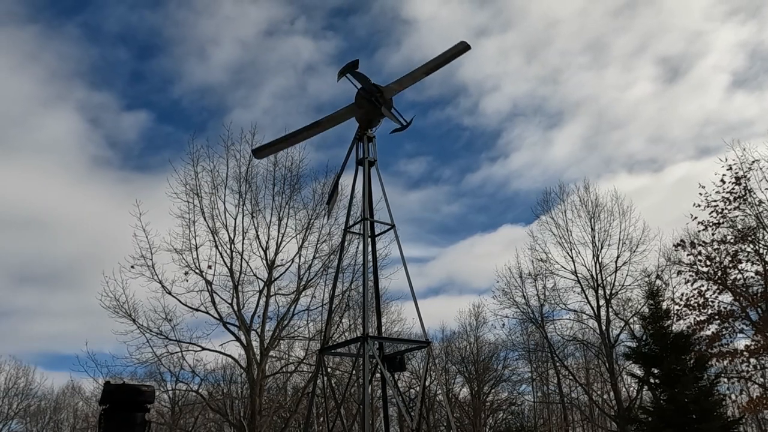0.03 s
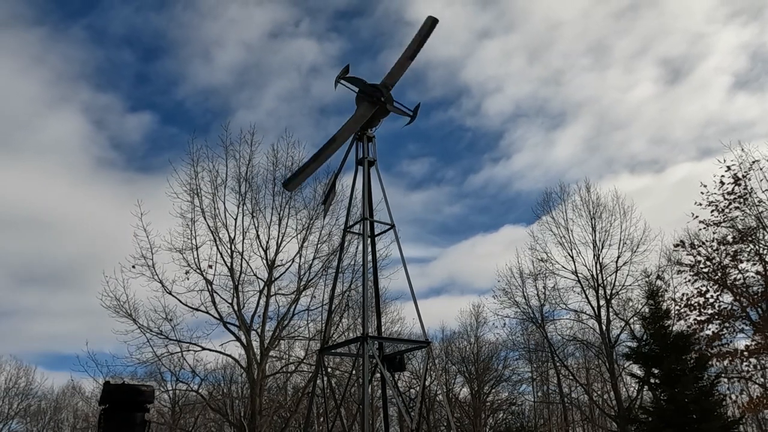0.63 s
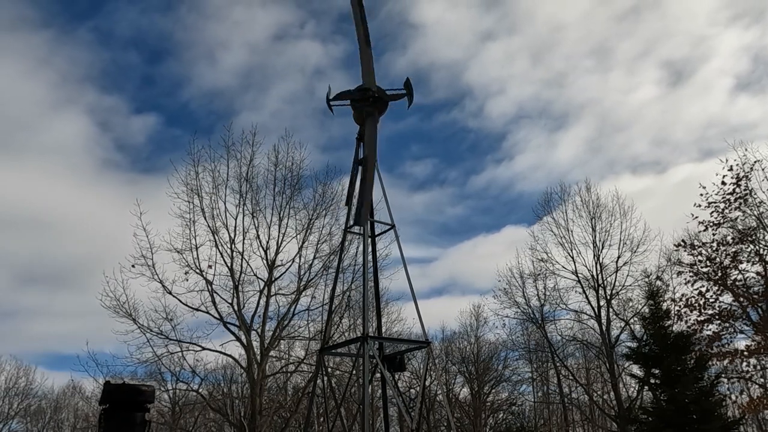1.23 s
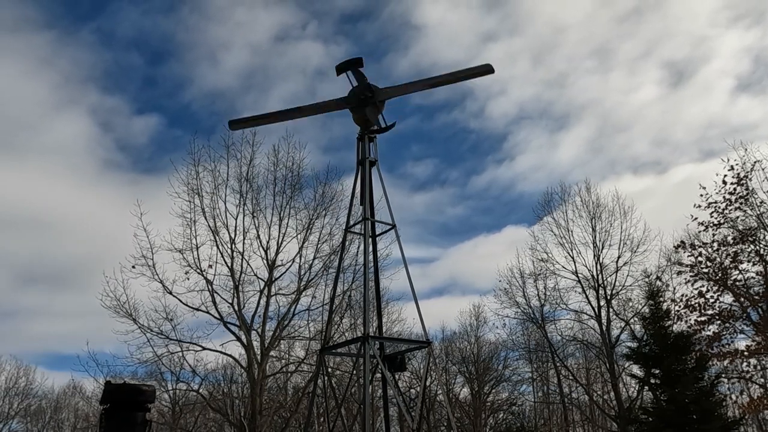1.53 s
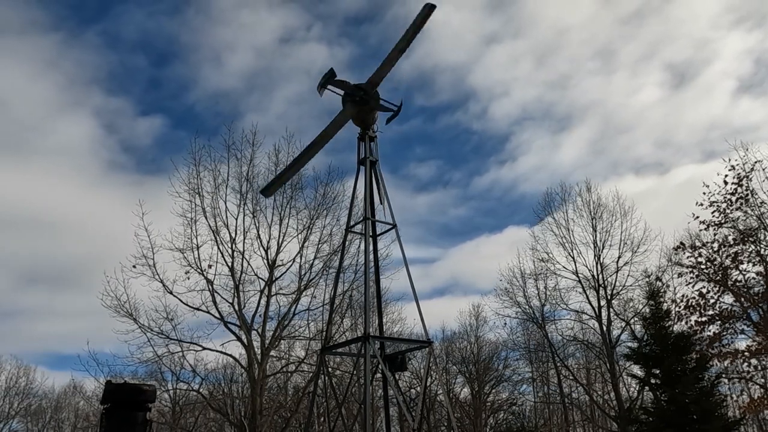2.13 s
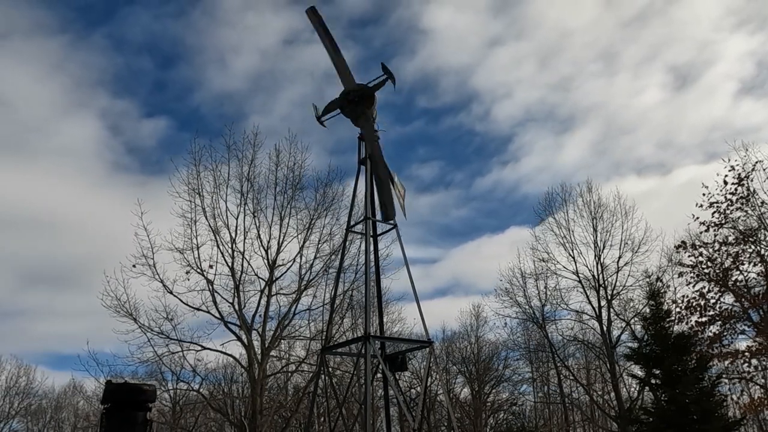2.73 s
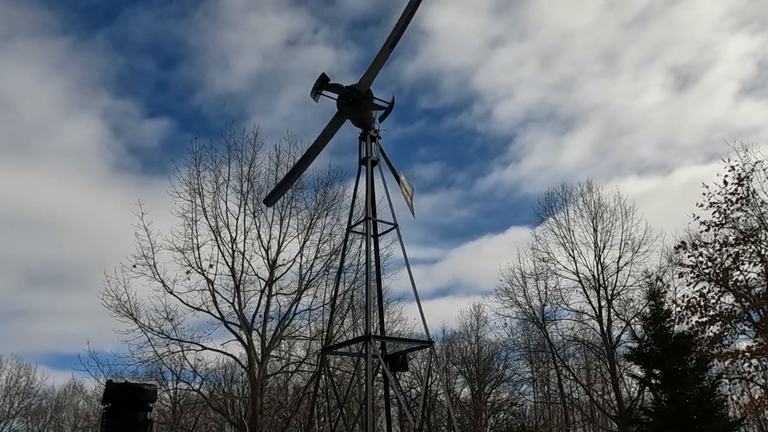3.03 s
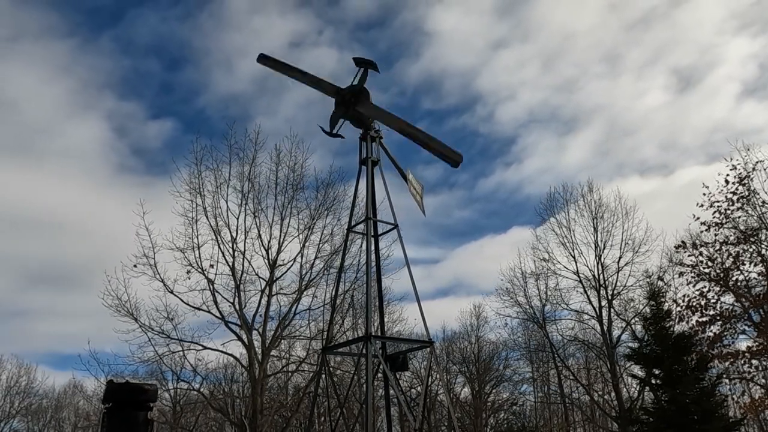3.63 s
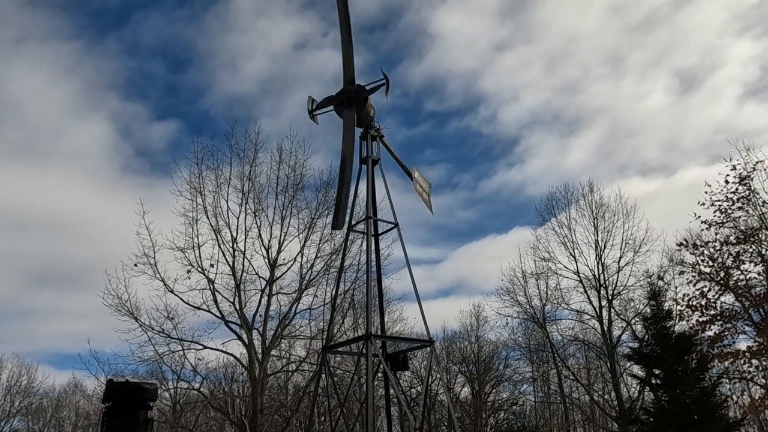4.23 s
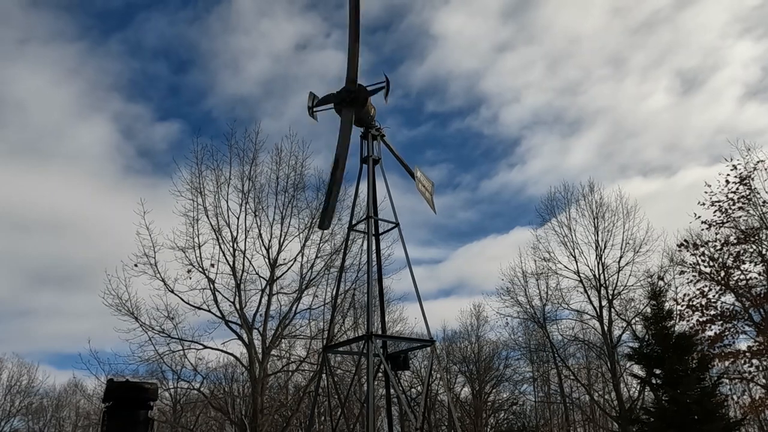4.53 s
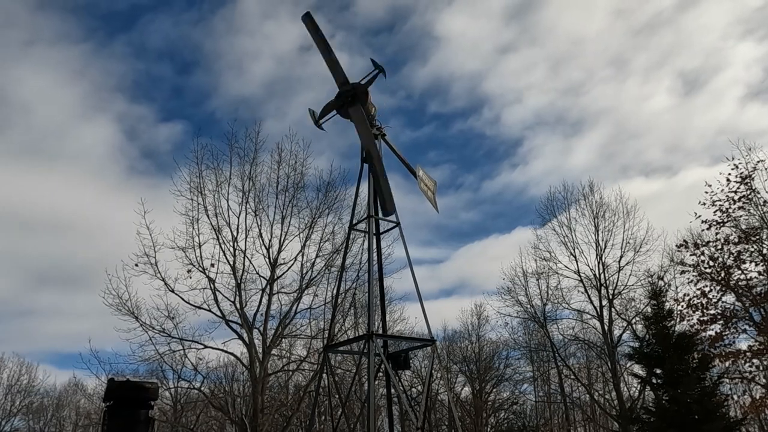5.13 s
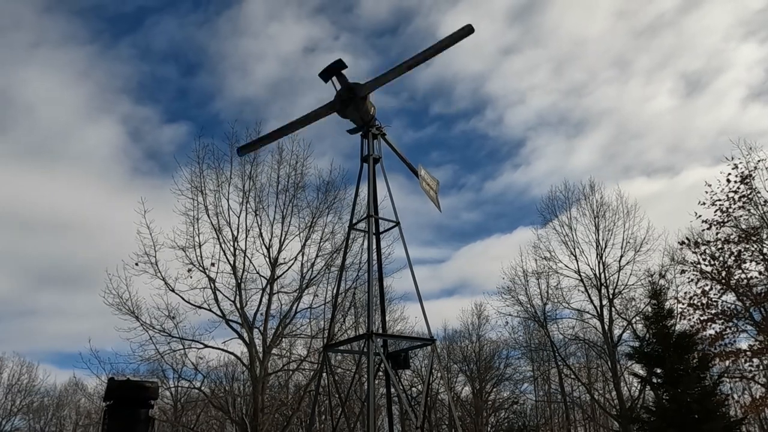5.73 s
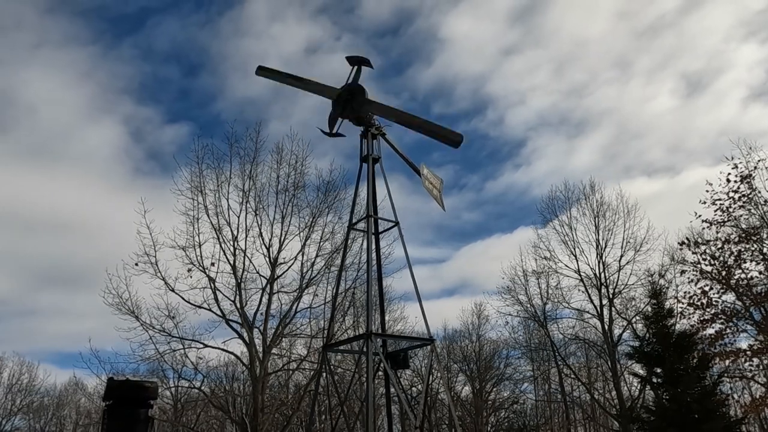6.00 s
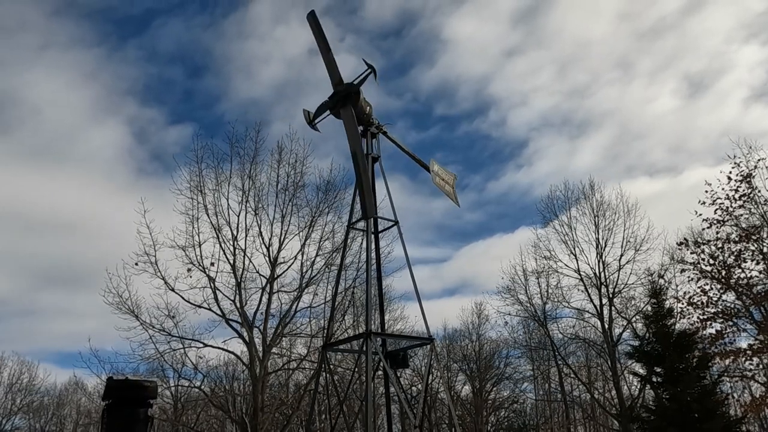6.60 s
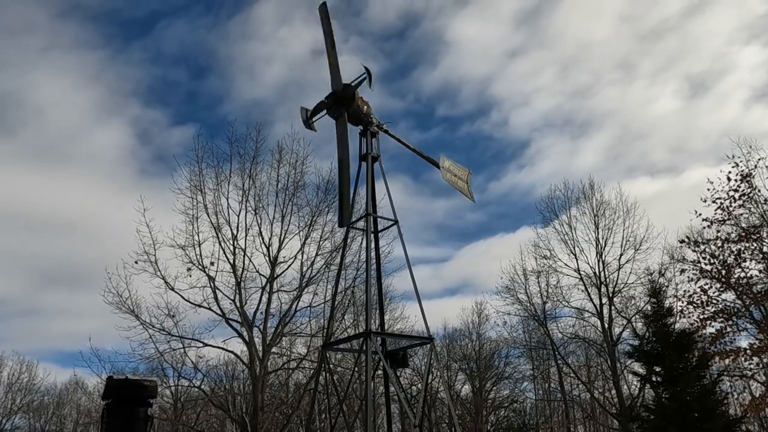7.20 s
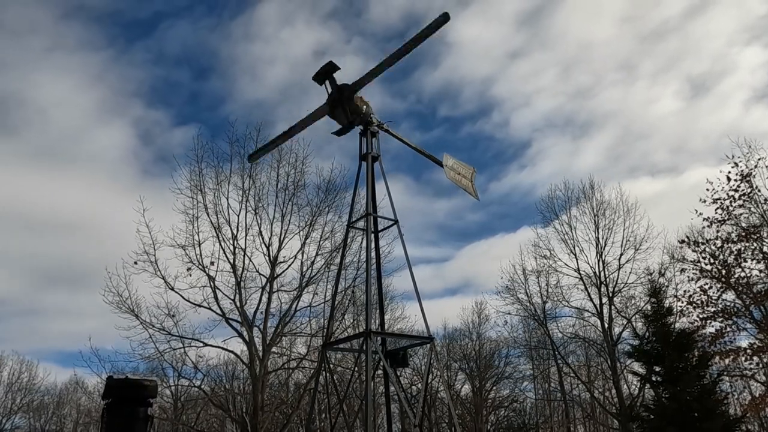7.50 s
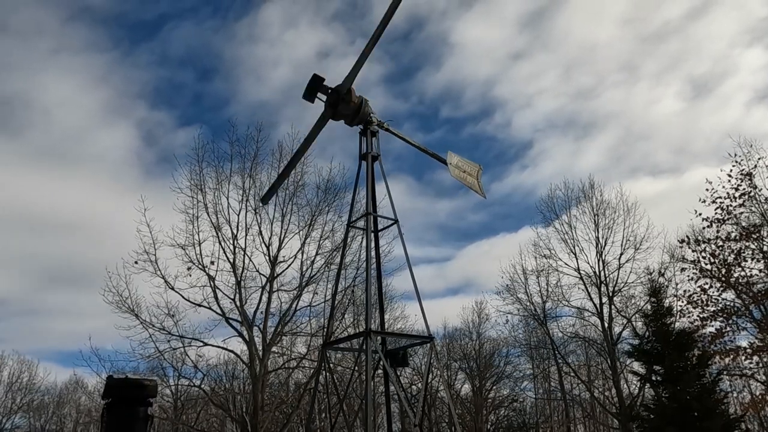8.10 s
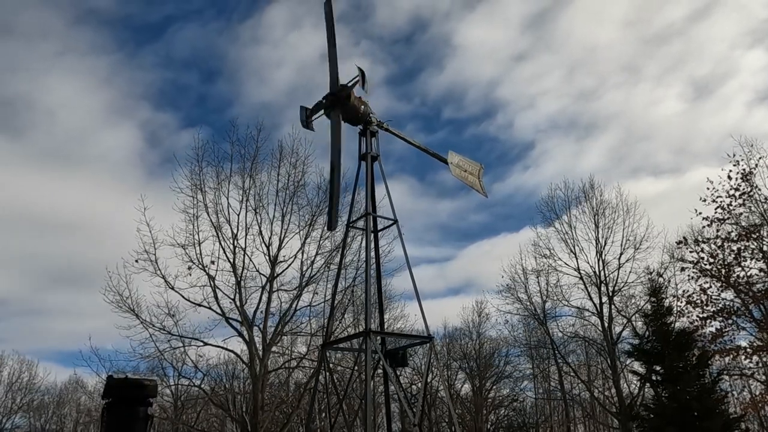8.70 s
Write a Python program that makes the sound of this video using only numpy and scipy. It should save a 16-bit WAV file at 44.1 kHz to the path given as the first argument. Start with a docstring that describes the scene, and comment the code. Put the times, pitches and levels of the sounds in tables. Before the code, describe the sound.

A wind turbine on a metal tower is heard from the ground, at first half buried by heavy wind buffeting the microphone. Its rapid, regular ticking emerges with swishing blades, short high squeaks, rattling parts and a low hum. As the gust fades, the rush in the trees softens and the ticks carry on slightly slower, with soft knocks between them and a few more wind thumps.

```python
"""Gusty wind thumps on the microphone and roars in bare trees, while a wind generator ticks and swishes.
Its two blades swish twice a turn, and its lattice tower drones. The mechanism ticks once a turn,
knocks softly in between and squeaks at speed. Loose parts chatter and scrape in the gust.
As the gust dies down, the rotor slows and the ticks spread apart."""
import sys
import numpy as np
from scipy import signal
from scipy.fft import rfft, irfft
from scipy.io import wavfile
from scipy.ndimage import uniform_filter1d

SR = 44100
rng = np.random.default_rng(int(sys.argv[2]) if len(sys.argv) > 2 else 0)


def unload_audio(sound):
    """Save the sound as a 16-bit wav file, at the path given as the first command line argument."""
    columns = np.transpose(np.atleast_2d(sound))
    # keep every value between -1 and 1, then stretch to whole-number steps
    steps = np.round(np.clip(columns, -1, 1) * 32767)
    wavfile.write(sys.argv[1], SR, steps.astype(np.int16))


N = 394694
TIME = np.arange(N) / SR
FREQS_HZ = np.arange(N // 2 + 1) * SR / N


def undb(db):
    """Turn decibels into a gain."""
    return 10 ** (np.asarray(db) / 20)


def unit(x):
    """Scale a signal to an average (rms) size of 1."""
    return x / np.sqrt(np.mean(x ** 2))


def curves(table, at=TIME):
    """Join a table's rows by straight lines in time: one curve for each column after the first."""
    times, *columns = np.transpose(table)
    return [np.interp(at, times, column) for column in columns]


def noise(colour):
    """Noise shaped by rows of (pitch_hz, level_db), fading away beyond the first and last row."""
    hz, db = np.transpose(colour)
    f = np.maximum(FREQS_HZ, 1)
    gain = undb(np.interp(np.log(f), np.log(hz), db))
    edges = np.minimum(f / hz[0], 1) ** 2 * np.minimum(hz[-1] / f, 1) ** 2
    return unit(irfft(rfft(rng.standard_normal(N)) * gain * edges, N))


def resonant(peaks):
    """Noise that hums around a few pitches, from rows of (pitch_hz, width_hz, level_db)."""
    gain = sum(undb(db) / np.sqrt(width) / (1 + ((FREQS_HZ - hz) / (width / 2)) ** 2)
               for hz, width, db in peaks)
    return unit(irfft(rfft(rng.standard_normal(N)) * gain, N))


def band_noise(low_hz, high_hz, size):
    """A short stretch of noise between two pitches."""
    band = signal.butter(3, [low_hz, high_hz], "band", fs=SR, output="sos")
    return unit(signal.sosfilt(band, rng.standard_normal(2 * size))[size:])


def wander(rate_hz):
    """A smooth random wobble of size about 1, with rate_hz new values a second."""
    hold = max(int(SR / rate_hz), 2)
    steps = np.repeat(rng.standard_normal(N // hold + 1), hold)
    return unit(uniform_filter1d(uniform_filter1d(steps, hold), hold)[:N])


def add(out, start_s, sound):
    """Mix a sound in at a given time."""
    i = int(np.clip(start_s * SR, 0, N - 1))
    out[i:i + len(sound)] += sound[:N - i]


def swell(middle_s, half_length_s):
    """A steep-sided bump in loudness: returns its start time and its shape."""
    t = np.arange(-2 * half_length_s, 2 * half_length_s, 1 / SR)
    return middle_s - 2 * half_length_s, np.exp(-np.abs(t / half_length_s) ** 4)


# How loud the trees roar: time_s, level_db
ROAR_LEVEL = [(0, -36), (.6, -46), (1.2, -69), (1.8, -38.5), (2.45, -35), (2.9, -42), (3.35, -37.5),
              (4.2, -42), (5.7, -42.5), (6.4, -44), (7, -47), (8.95, -47.5)]
# The tone of the roar: pitch_hz, level_db
ROAR_COLOUR = [(100, 7), (300, 4.5), (600, 0), (850, 0), (1100, 0.5), (1400, -8), (1800, -20), (3000, -43),
               (7000, -27), (12000, -42.5)]
# The wind's faint whistle: pitch_hz, width_hz, level_db
WHISTLE_PEAKS = [(773, 26, 0.5), (880, 120, 2)]
# The tone of the steady hiss: pitch_hz, level_db
HISS_COLOUR = [(2000, 15.5), (7500, 4), (9500, -1), (10800, -6.5), (12300, -2), (13500, -33)]

def trees():
    """Wind roars through bare branches, with a faint whistle and a steady hiss."""
    level_db, = curves(ROAR_LEVEL)
    roar = undb(level_db + 0.5 * wander(rate_hz=21)) * noise(ROAR_COLOUR)
    whistle = undb(-57 + 0.99 * wander(rate_hz=4.15)) * resonant(WHISTLE_PEAKS)
    return roar + whistle + undb(-60.5) * noise(HISS_COLOUR)


# Wind strength at the microphone: time_s, rumble_db, flutter_db
WIND_LEVEL = [(0, -17.5, -23), (.45, -21.5, -20.5), (.9, -20, -25.5), (1.25, -21, -24), (1.6, -23.5, -30.5),
              (2.25, -25, -31), (2.72, -23, -23.5), (3.05, -26.5, -34.5), (3.35, -25, -31.5),
              (3.95, -28, -39.5), (4.25, -33, -40), (4.7, -33, -53), (5.4, -29.5, -42), (6.1, -35.5, -50),
              (6.85, -33.5, -39.5), (7.45, -38, -38.5), (8.03, -29.5, -37), (8.4, -36, -50.5),
              (8.95, -30.5, -37.5)]
# Single puffs on top of it: middle_s, rumble_db, flutter_db, width_s
WIND_PUFFS = [(2.755, -29, -26, 0.097), (5.073, -29, -34.5, 0.034), (5.661, -21, -27, 0.043),
              (5.826, -28, -41, 0.038), (6.415, -28, -36.5, 0.059), (7.07, -39, -34, 0.083),
              (7.507, -36, -33, 0.047), (7.807, -31, -31.5, 0.037), (8.2, -34, -35, .03),
              (8.361, -25, -60, 0.013), (8.527, -18, -35.5, 0.028), (8.692, -22, -51, 0.043)]
# The tones of the rumble and the flutter: pitch_hz, level_db
RUMBLE_COLOUR = [(10, 7.5), (22, 6), (50, 3.5), (100, -5), (150, -14), (250, -20), (500, -53)]
FLUTTER_COLOUR = [(50, 3), (100, 6), (175, 2), (215, -3), (300, -9.5), (450, -17.5), (700, -26.5),
                  (1500, -49)]

def buffeting():
    """Wind pushes on the microphone: a deep rumble and a faster flutter swell with each puff."""
    wind_db = curves(WIND_LEVEL)
    rumble_gain, flutter_gain = undb(wind_db)
    for middle_s, rumble_db, flutter_db, width_s in WIND_PUFFS:
        puff = np.exp(-.5 * ((TIME - middle_s) / width_s) ** 2)
        rumble_gain = np.hypot(rumble_gain, undb(rumble_db) * puff)
        flutter_gain = np.hypot(flutter_gain, undb(flutter_db) * puff)
    # a weak wind comes more in fits
    fits_db = np.interp(wind_db[0], [-34, -22], [2.3, 1]) * wander(rate_hz=24)
    rumble = rumble_gain * noise(RUMBLE_COLOUR)
    flutter = flutter_gain * undb(0.46 * wander(rate_hz=69)) * noise(FLUTTER_COLOUR)
    return undb(fits_db) * (rumble + flutter)


def eddy(db, length_s, hz):
    """A swirl of air makes a ragged thump: one sharp pressure kick among weaker, slower ones."""
    t = TIME[:int(4 * length_s * SR) + SR // 50] - 2 * length_s - .01
    out = np.zeros(len(t))
    for k, (when, weak, slow, skew) in enumerate(rng.random((3 + int(hz * length_s), 4))):
        lesser = k > 0  # the first kick is the main one
        offset_s = lesser * 1.4 * length_s * (2 * when - 1)
        cycles = (t - offset_s) * hz * (1 - lesser * 0.5 * slow)
        kick = np.exp(-np.abs(cycles / 0.42) ** 1.34) * np.cos(2 * np.pi * (cycles + skew))
        out += undb(db - lesser * (2.5 + 6.3 * weak)) * kick
    return out


# Strong swirls of air: middle_s, level_db, length_s, pitch_hz
STRONG_EDDIES = [(0.151, -11.5, 0.015, 345), (0.21, -10, 0.0095, 346), (.347, -12.5, 0.017, 430),
                 (0.4, -16, 0.004, 370), (0.45, -13.5, 0.0089, 470), (0.474, -17.5, 0.0034, 590),
                 (.515, -12, 0.014, 420), (0.745, -13.5, 0.012, 400), (0.851, -14.5, 0.0062, 347),
                 (0.894, -14.5, 0.01775, 350), (1.078, -13.5, 0.0088, 454), (1.12, -18, 0.0031, 360),
                 (1.17, -17, 0.0083, 268), (1.295, -21, 0.0023, 368), (1.375, -17, 0.0041, 330),
                 (2.764, -13, 0.021, 296), (5.121, -14.5, 0.017, 150), (5.67, -13, 0.02, 175),
                 (7.756, -19.5, 0.0052, 125), (7.899, -21.5, 0.0053, 188), (8.521, -15, 0.0042, 140)]

def eddies():
    """Swirls hit the microphone; small random ones get louder and sharper in stronger wind."""
    out = np.zeros(N)
    when, size = rng.random(size=(70, 2)).T
    small_s = when * TIME[-1]
    small_db = curves(WIND_LEVEL, small_s)[1] + 2.4 + 6 * size
    small = [(s, db, .004, 290 * undb(.5 * (db + 11.5))) for s, db in zip(small_s, small_db)]
    for middle_s, db, length_s, hz in STRONG_EDDIES + small:
        thump = eddy(db, length_s, hz)
        add(out, middle_s - len(thump) / SR / 2, thump)
    return out


# How loud the tower drones: time_s, level_db
DRONE_LEVEL = [(0, -67), (1.5, -41), (2.2, -30), (3.6, -32.5), (4.3, -38.5), (5.5, -46.5), (6.3, -48),
               (7.2, -47), (8.2, -48), (8.95, -63)]
# The tower's low notes: pitch_hz, width_hz, level_db
TOWER_PEAKS = [(169.3, 37, 4), (217, 64, -16.5)]

def tower():
    """The turning generator makes the lattice tower drone."""
    level_db, = curves(DRONE_LEVEL)
    return undb(level_db - 3.5) * resonant(TOWER_PEAKS)


# The rotor runs down as the wind drops: time_s, turns_per_s
ROTOR_SPEED = [(0.0, 7.729), (0.6, 7.373), (1.5, 7.045), (1.9, 7.499), (3.1, 7.068), (3.6, 7.323),
               (4.2, 6.755), (5.3, 6.442), (6.3, 5.978), (7.5, 5.808), (8.4, 5.539), (8.95, 5.571)]

def rotor_turns():
    """How many turns the rotor has made, starting just short of zero."""
    speed, = curves(ROTOR_SPEED)
    return np.cumsum(speed) / SR - .107


def each_turn(place):
    """The times at which the rotor passes a place (0 to 1) in its turn."""
    turns = rotor_turns() - place
    return np.interp(np.arange(np.ceil(turns[0]), turns[-1]), turns, TIME)


# How loud the air rushes over the blades: time_s, level_db
BLADE_LEVEL = [(0.0, -41.5), (0.65, -47.5), (1.35, -46.5), (1.64, -42.5), (1.92, -44), (2.24, -45),
               (3.14, -45), (4.19, -52.5), (5.36, -57.5), (6.01, -55), (6.73, -58.5), (8.95, -62.5)]
# The tone of that rush: pitch_hz, level_db
RUSH_COLOUR = [(200, -19), (500, 3), (800, 4.5), (1400, 9.5), (1900, 3), (2800, 1.5), (4000, -5.5),
               (5500, -11.5), (7500, -20.5), (9300, -24), (10500, -33), (12500, -60), (14000, -54)]
# The hollow note in it: pitch_hz, width_hz, level_db
HOLLOW_PEAKS = [(1340, 540, 6), (2920, 980, -27)]

def blades():
    """Churning air makes a grainy hiss that swells as each blade sweeps towards the listener."""
    level_db, = curves(BLADE_LEVEL)
    turns = rotor_turns()
    swish_db = 1.14 * np.cos(2 * np.pi * 2 * (turns - .42))
    uneven_db = 0.094 * np.cos(2 * np.pi * (turns - .2))  # one blade is a little weaker
    grain_db = 1.06 * wander(rate_hz=250) + 1.17 * wander(rate_hz=30)
    # the hollow note grows faster than the hiss
    hollow = undb(-2.5 + .5 * (level_db - level_db.max())) * resonant(HOLLOW_PEAKS)
    return undb(level_db + 3.5 + swish_db + uneven_db + grain_db) * (noise(RUSH_COLOUR) + hollow)


# Short narrow rasps of metal, some sounding with a tick's clack: middle_s, pitch_hz, level_db, half_length_s
METAL_SCRAPES = [(1.69, 2630, -40.5, 0.026), (1.93, 3180, -39, .005), (2.513, 2820, -43, 0.0066),
                 (3.334, 2880, -45, 0.017), (8.836, 2780, -46, 0.0037)]

def scrapes():
    """Loose metal rubs briefly, sounding one narrow band of noise each time."""
    out = np.zeros(N)
    for middle_s, hz, db, half_length_s in METAL_SCRAPES:
        start_s, shape = swell(middle_s, half_length_s)
        add(out, start_s, undb(db) * shape * band_noise(.92 * hz, 1.08 * hz, len(shape)))
    return out


# Squeaks while the rotor runs fast: middle_s, pitch_hz, level_db
DRY_SQUEAKS = [(.915, 4500, -43), (1.3, 4630, -42), (1.435, 4700, -37.5), (1.58, 4840, -40),
               (1.715, 4800, -41), (1.85, 4850, -44), (1.985, 4820, -37), (2.258, 4760, -38),
               (2.395, 4750, -40), (2.667, 4800, -41.5), (2.805, 4720, -40), (2.945, 4700, -35),
               (3.087, 4850, -39), (3.218, 7650, -48)]

def squeaks():
    """A dry part squeaks with a trembling pitch and a stuttering grip, then catches again more softly."""
    out = np.zeros(N)
    second_catches = [(s + .045, hz, db - 7) for s, hz, db in DRY_SQUEAKS]
    for middle_s, hz, db in DRY_SQUEAKS + second_catches:
        start_s, shape = swell(middle_s, half_length_s=.0074 * np.exp(.3 * rng.standard_normal()))
        tremble, grip = (band_noise(60, 450, len(shape)) for _ in range(2))
        phase = 2 * np.pi * np.cumsum(hz * (1 + .013 * tremble)) / SR
        tone = np.sin(phase) + undb(-20) * np.sin(2 * phase)
        add(out, start_s, undb(db - 2.8) * shape * (.8 + .7 * grip) * tone)
    return out


def blows(times, dbs, bounce_db, decay_s, tail_s, tail_db, scrape_db, bounce_s=.0045):
    """The loudness of loose hits: a scrape, a blow, a bounce, and a tail scattered by tower and ground."""
    power, t = np.zeros(N), TIME[:SR // 5]
    hit = np.exp(-2 * t / decay_s)
    tail = undb(2 * tail_db) * np.exp(-2 * t / tail_s)
    for s, db, (late, lead) in zip(times, dbs, rng.standard_normal((len(times), 2))):
        add(power, s, undb(2 * db) * (hit + tail))  # doubling the decibels gives power
        add(power, s + bounce_s * np.exp(.3 * late), undb(2 * (db + bounce_db)) * hit)
        start_s, scrape = swell(s - .006, half_length_s=0.014 * np.exp(0.44 * lead))
        add(power, start_s, undb(2 * (db + scrape_db)) * scrape)
    return np.sqrt(power)


def dulled(contacts, onset_turns_per_s=6.8, cutoff_hz=11200):
    """A fast rotor drags its contacts, which takes away their highest treble."""
    speed, = curves(ROTOR_SPEED)
    share = .5 + .5 * np.tanh((speed - onset_turns_per_s) / .15)
    soft = irfft(rfft(contacts) / (1 + (FREQS_HZ / cutoff_hz) ** 6), N)
    return share * soft + (1 - share) * contacts


# The notes of the struck metal: pitch_hz, ring_s (time to fade by 60 dB), level_db
METAL_NOTES = [(1348, 0.15, -2.5), (2408, 0.1, -7.5), (2756, 0.047, -1.5), (3120, 0.05, -4.5),
               (5710, 0.038, -5), (7290, 0.058, -5.5), (7630, 0.029, -3), (8640, 0.028, -9.5)]

def ringing(times, low_dbs, high_dbs):
    """Struck metal rings in low and high notes; each blow lands a little differently."""
    out, t = np.zeros(N), TIME[:SR // 8]
    hz, ring_s, db = np.transpose(METAL_NOTES)[:, :, None]
    fade = np.exp(-np.log(1000) * t / ring_s) * (1 - np.exp(-t / .0004))
    chances = rng.standard_normal((len(times), 3, len(METAL_NOTES), 1))
    for s, low_db, high_db, (force, detune, offset) in zip(times, low_dbs, high_dbs, chances):
        gain = undb(db + np.where(hz < 4000, low_db, high_db) + 2.1 * force)
        phase = 2 * np.pi * (hz * (1 + .017 * detune) * t + offset)
        add(out, s, np.sum(gain * np.sin(phase) * fade, axis=0))
    return out


# How loud the loose parts chatter: time_s, level_db
CHATTER_LEVEL = [(0, -64), (.7, -50.5), (1.3, -45), (1.7, -45.5), (2.6, -47.5), (3.3, -43.5), (3.8, -50),
                 (4.5, -60)]
# The tones of a full clack and a bright click, also used by the ticks: pitch_hz, level_db
CLACK_COLOUR = [(600, -2.5), (1350, 2.5), (1850, -2.5), (2750, 0), (3700, -5.5), (4900, -13.5), (6500, -18),
                (12000, -27.5)]
CLICK_COLOUR = [(2500, -4), (4500, 5.5), (5800, 5), (7500, -1), (8800, -0.5), (10300, -14.5), (12500, -19),
                (15000, -29)]

def rattle():
    """Loose parts hit at random: rings follow the blades' loudness, and dry clicks crowd the gust."""
    when, force = rng.random(size=(170, 2)).T
    hit_s = when * TIME[-1]
    hit_db = 1.184 * curves(BLADE_LEVEL, hit_s)[0] + 7 * force
    ring = ringing(hit_s, hit_db + 6.5, hit_db - 14)
    when, weak = rng.random(size=(480, 2)).T
    click_s = when * CHATTER_LEVEL[-1][0]
    click_db = curves(CHATTER_LEVEL, click_s)[0] - 12 * weak
    clicks = blows(click_s, click_db, bounce_db=-3, decay_s=.003,
                   tail_s=.015, tail_db=-17, scrape_db=-30, bounce_s=.008)
    return dulled(ring + clicks * (noise(CLICK_COLOUR) + undb(5) * noise(CLACK_COLOUR)))


# Where in the turn the knock falls, and how hard: time_s, place_turns, level_db
KNOCK_PATTERN = [(0, 0.41, -61), (1.7, 0.37, -56), (2.8, 0.44, -41), (3.35, 0.32, -36.5), (3.65, 0.48, -39),
                 (4.1, 0.59, -55), (5.3, 0.33, -65), (5.75, 0.54, -43), (6.45, 0.5, -63), (6.95, 0.42, -46),
                 (7.5, 0.46, -56), (8.15, 0.48, -44.5), (8.47, 0.43, -42), (8.95, 0.4, -45)]
# The tone of the knock: pitch_hz, level_db
KNOCK_COLOUR = [(900, -21), (1900, -18), (2400, 2), (3000, 4), (4000, -8), (8000, -27)]

def knocks():
    """The slack mechanism knocks softly once a turn, between the ticks."""
    knock_s = each_turn(curves(KNOCK_PATTERN)[0])
    _, knock_db = curves(KNOCK_PATTERN, knock_s)
    shape = blows(knock_s, knock_db, bounce_db=.5, decay_s=.0041, tail_s=.058, tail_db=-11.5, scrape_db=-9)
    return undb(-5) * shape * noise(KNOCK_COLOUR)


# The once-a-turn ticks after the first few turns: start_s, clack_db, click_db
TURN_TICKS = [(1.511, -35.5, -45.5), (1.654, -33, -47), (1.787, -35, -41), (1.923, -35, -41.5),
              (2.057, -34, -41.5), (2.193, -37.5, -40), (2.33, -52, -45), (2.464, -33, -49),
              (2.599, -38, -47), (2.738, -41, -46.5), (2.88, -35, -46), (3.02, -35, -44.5),
              (3.163, -36, -42), (3.303, -34, -42), (3.441, -36.5, -40.5), (3.578, -36, -45),
              (3.713, -42, -45.5), (3.855, -42, -46), (4.002, -45, -45.5), (4.146, -43.5, -49),
              (4.29, -50, -49.5), (4.447, -52, -51), (4.59, -44, -47), (4.744, -42.5, -46.5),
              (4.891, -42.5, -47), (5.047, -41.5, -47), (5.199, -43, -48.5), (5.355, -41.5, -46.5),
              (5.511, -42.5, -51), (5.672, -45.5, -54.5), (5.832, -48, -55), (5.997, -47, -50),
              (6.157, -42.5, -47.5), (6.327, -42, -46.5), (6.495, -42.5, -42.5), (6.662, -41.5, -41.5),
              (6.828, -43.5, -44.5), (6.998, -44, -44), (7.168, -42, -46), (7.347, -39.5, -45.5),
              (7.512, -43, -46.5), (7.686, -41.5, -46), (7.862, -42, -46), (8.037, -43.5, -47),
              (8.216, -41.5, -49.5), (8.396, -45.5, -50), (8.578, -38.5, -48), (8.759, -37.5, -51),
              (8.936, -40.5, -47)]
# How freely the metal rings after a tick: time_s, boost_db
RING_BOOST = [(0, -7), (3, -0.5), (4.3, -0.5), (5.4, 5.5), (6.7, 0.5), (7.3, -7), (8.9, -11)]

def mechanism():
    """Each turn brings a light touch, a bright click, a clack as the part seats, a ring and a knock."""
    # the first turns tick evenly, half buried in the wind
    early = [(s, -41.5, -51) for s in each_turn(0) if s < TURN_TICKS[0][0] - .05]
    tick_s, clack_db, click_db = np.transpose(early + TURN_TICKS)
    ring_db, = curves(RING_BOOST, tick_s)
    speed, = curves(ROTOR_SPEED, tick_s)
    # a part that rings freely seats later and has less dry click
    seat_s = tick_s + np.interp(ring_db, [-6, 3], [.0004, .004])
    dry_db = click_db - 0.055 * ring_db
    seat = blows(seat_s, clack_db, bounce_db=-5, decay_s=.0067, tail_s=.046, tail_db=-8.5, scrape_db=-20)
    clack = seat * noise(CLACK_COLOUR)
    snap = blows(tick_s, dry_db, bounce_db=-4.5, decay_s=.0035, tail_s=.035, tail_db=-13.5, scrape_db=-20)
    # the touch comes 0.13 turns early and grows with the tick's force
    touch_s = tick_s - 0.13 / speed
    touch_db = dry_db - 10.5 + 0.6 * (dry_db + 41)
    touch = blows(touch_s[1:], touch_db[1:], bounce_db=-8, decay_s=.0023,
                  tail_s=.02, tail_db=-16, scrape_db=-8)
    knock = knocks()
    grit = undb(2 * wander(rate_hz=2500))
    ring = ringing(tick_s + 0.000973, clack_db - 4.5, click_db + ring_db + 1.5)
    click = undb(1) * np.hypot(snap, touch) * noise(CLICK_COLOUR)
    return dulled(grit * (clack + knock + click) + ring)


def scene():
    """The generator and the wind, heard at one microphone on the ground."""
    generator = mechanism() + rattle() + squeaks() + scrapes() + blades() + tower()
    return (generator + trees() + buffeting() + eddies())[None]


def record(dry):
    """Cut away the very highest treble."""
    top_hz = 15200
    return signal.sosfilt(signal.ellip(8, .2, 70, top_hz, fs=SR, output="sos"), dry)


dry = scene()
out = record(dry)
unload_audio(out)
```